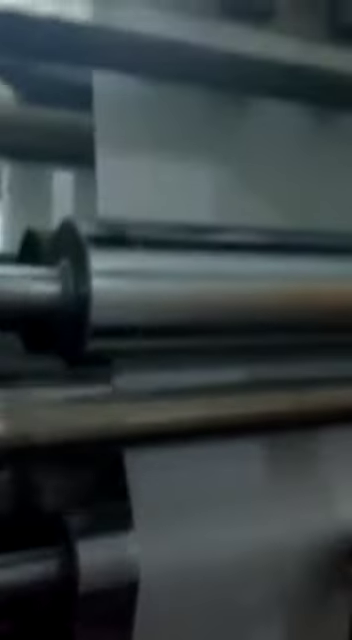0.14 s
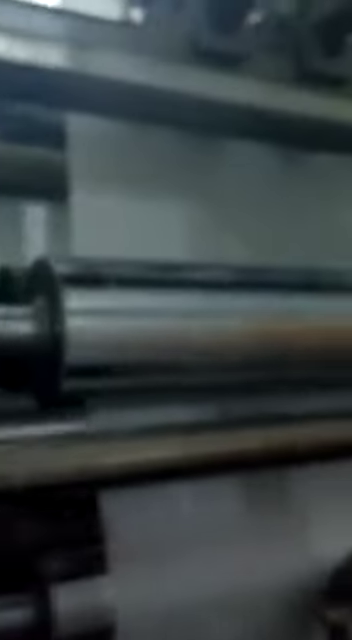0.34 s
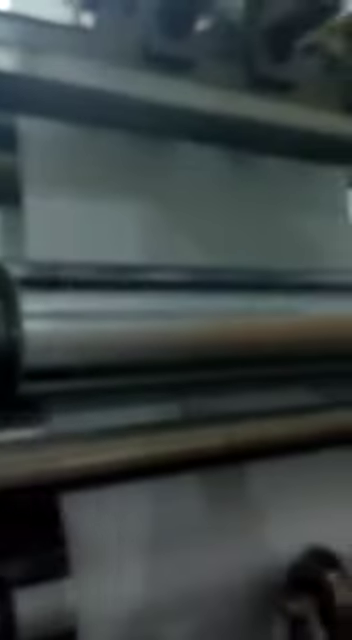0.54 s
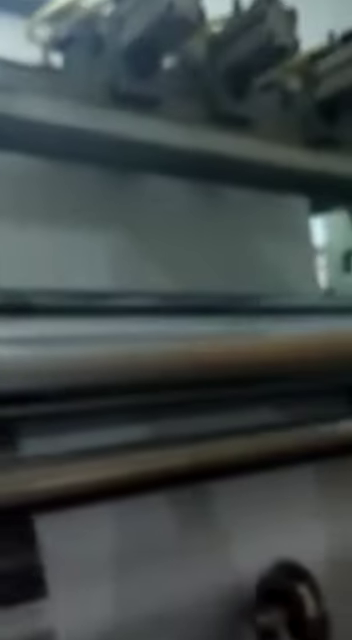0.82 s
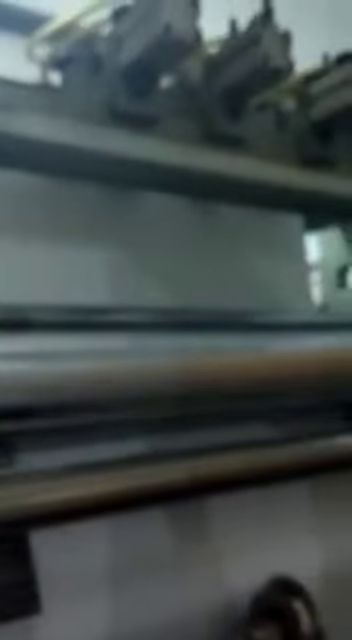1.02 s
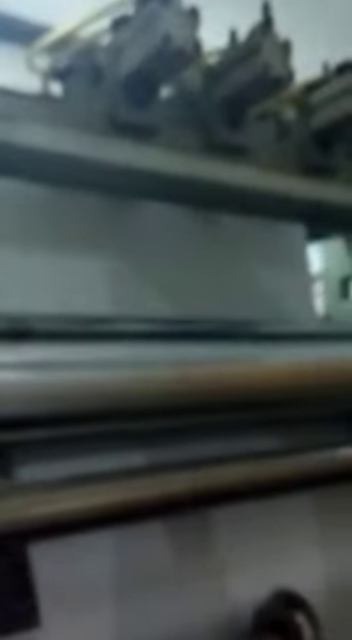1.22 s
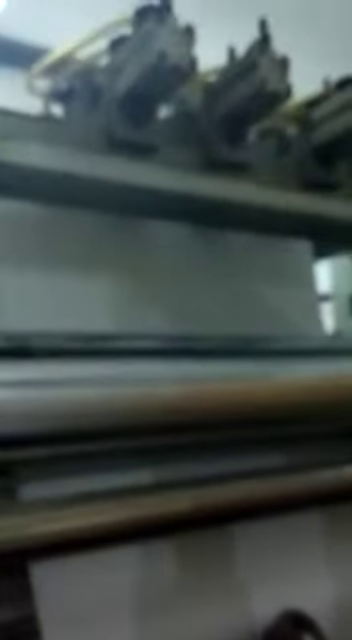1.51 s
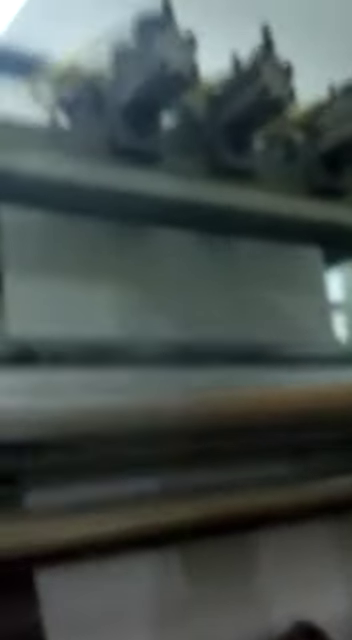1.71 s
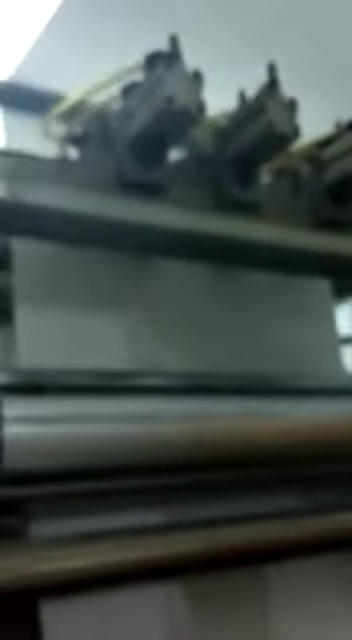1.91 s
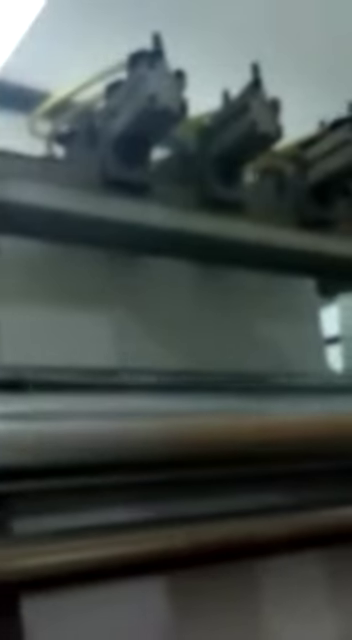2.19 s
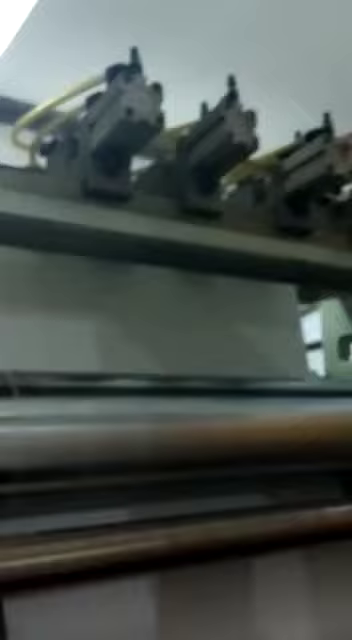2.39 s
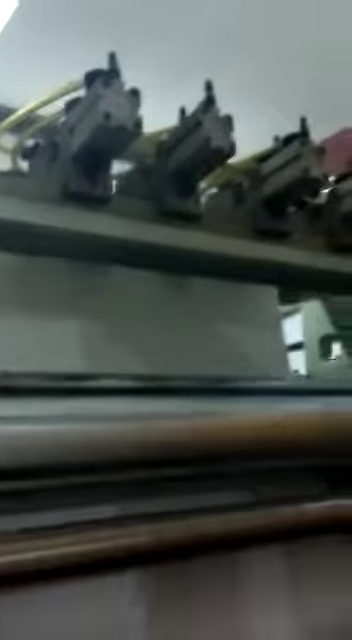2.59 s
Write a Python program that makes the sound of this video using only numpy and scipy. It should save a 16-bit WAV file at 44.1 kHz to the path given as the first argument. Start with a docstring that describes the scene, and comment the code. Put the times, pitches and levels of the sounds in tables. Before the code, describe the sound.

A paper converting machine runs throughout, close and loud in a workshop, in wide phone stereo. Dense midrange roller roar and low motor hum stay steady, swelling briefly near 0.2 s. Bright suction hiss pulses with dull clacks and sharp ticks, repeating every 0.66 s over fine rattle. A thin whine around 2.2 kHz beats quickly at first, then steadies and strengthens after 1.9 s. It never stops.

```python
"""In a workshop a paper converting machine runs: rollers and motors roar, suction air hisses, two gears whine.
Roar and hiss are shaped noise, hum and whine are drifting sines that beat, contacts are decaying noise bands.
The folding mechanism repeats a cycle of clacks and ticks, and the hiss breathes with it.
A phone hears it with two microphone ports and widens the stereo by subtracting each, delayed, from the other."""
import sys
import numpy as np
from scipy import signal
from scipy.fft import rfft, irfft, next_fast_len
from scipy.io import wavfile
from scipy.ndimage import uniform_filter1d, map_coordinates

SR = 44100
rng = np.random.default_rng(int(sys.argv[2]) if len(sys.argv) > 2 else 0)


def dump_mix(stems):
    """Bounce the given channels to the path in sys.argv[1] as a 16-bit WAV at rate SR."""
    frames = np.atleast_2d(stems).T  # one column per channel
    limited = np.clip(frames, -1, 1)  # hard clip at full scale
    pcm = np.round(limited * 32767).astype(np.int16)
    wavfile.write(sys.argv[1], SR, pcm)


N = 121275

CYCLE_S = .6575  # period of the folding mechanism
# Swing of the hiss through one cycle: (time into the cycle [s], level [dB])
BREATH = [(0, 1), (.045, 3), (.075, -6), (.14, -2), (.19, -3), (.26, -3), (.29, -6), (.35, -3.5), (.42, 0),
          (.47, 0.5), (.54, -2.5), (.62, 1.5)]
# Slow level of the two broadband sources: (time [s], roar level [dB], hiss level [dB])
SLOW_LEVELS = [(0, -3, -0.5), (.2, 4, 4.5), (.45, 1.5, 2.5), (.7, 1, 0), (.9, 2, 5), (.96, 1.5, 2),
               (1.1, 1.5, 1.5), (1.3, 2, 1), (1.42, -1, -0.5), (1.6, 1.5, 1.5), (1.8, 1.5, 1.5),
               (2.0, 2, 0), (2.25, 0.5, 2.5), (2.5, 0, -0.5), (2.62, 1.5, 2.5), (2.75, -1, 1.5)]


def amp(db):
    """Decibel law: an amplitude ratio is ten to the power dB / 20."""
    return 10 ** (np.asarray(db) / 20)


def along(points, hz):
    """Logarithmic frequency scale: columns of (frequency, ...) rows interpolated along it."""
    f, *columns = np.transpose(points)
    return np.array([np.interp(np.log(hz + 1), np.log(f + 1), c) for c in columns])


def curves(rows, period=None):
    """Envelope by linear interpolation: one value per sample for each column after the time."""
    knots_s, *columns = np.transpose(rows)
    return [np.interp(np.arange(N) / SR, knots_s, c, period=period) for c in columns]


def wobble(rate):
    """Slow random modulation: a smooth curve through `rate` Gaussian knots a second."""
    knots = rng.standard_normal(int(N * rate / SR) + 4)
    return map_coordinates(knots, [np.arange(N) * rate / SR])


def filtered(pair, response):
    """Linear filtering: a frequency-dependent rule acts on the spectra of the rows."""
    size = next_fast_len(N + 8192)
    spectra = response(rfft(pair, size), np.fft.rfftfreq(size, 1 / SR))
    return irfft(spectra, size)[..., :N]


def rush(gain, patchy_db):
    """Turbulent noise: two independent rows share random patches of level, then take a spectral gain."""
    spectra = signal.stft(rng.standard_normal((2, N)), nperseg=512)[2]
    # smooth over 6 frequency bins, then over 10 time frames
    field = uniform_filter1d(rng.standard_normal(spectra.shape[1:]), 6, 0)
    field = uniform_filter1d(field, 10, 1)
    patches = amp(patchy_db * field / field.std())
    pair = signal.istft(spectra * patches, nperseg=512)[1][:, :N]
    # about 0 dB per Hz before the gain
    return filtered(pair * np.sqrt(SR / 2), lambda z, hz: z * gain(hz))


def tone(hz, db, drift, start_s=0):
    """Phase modulation: a complex sine of rms level db, its phase wandering by about `drift` rad."""
    t = np.arange(N) / SR - start_s
    return np.sqrt(2) * amp(db) * np.exp(2j * np.pi * hz * t + 1j * drift * wobble(5.32))


def add_ring(out, start_s, hz, width_hz, db, t60):
    """Damped resonance: band-passed noise, independent in the two rows, decays 60 dB in t60 seconds."""
    attack_s = .003
    t = np.arange(int(.1 * SR)) / SR
    edges = np.clip([hz - width_hz / 2, hz + width_hz / 2], 100, SR / 2 - 100)
    band = signal.butter(2, edges, "band", fs=SR, output="sos")
    ring = signal.sosfilt(band, rng.standard_normal((2, len(t))))
    decay = amp(db - 60 * t / t60)
    onset = 1 - np.exp(-t / attack_s)
    out[:, round(start_s * SR):][:, :len(t)] += ring / ring.std() * decay * onset


def roller_roar():
    """Source and resonator: the noise of rollers and motors drones through the modes of the casing."""
    # Spectrum before the casing and the level curves: (frequency [Hz], density [dB per Hz])
    roar_spectrum = [(20, -70), (35, -60), (60, -59), (100, -47), (150, -46.5), (210, -44), (300, -50.5),
                     (450, -51), (620, -53), (800, -61.5), (1200, -57), (1450, -59.5), (1650, -59.5),
                     (2150, -62.5), (2350, -61.5), (2550, -61.5), (2800, -64), (3300, -67), (4200, -69.5),
                     (6000, -84), (9000, -116)]
    # Casing resonances: (frequency [Hz], width [Hz], gain at the centre [dB])
    casing_modes = [(182, 21, 1), (360.4, 18, 5), (487, 46, 3.5), (633.6, 24, 4.5), (806, 37, 4.5),
                    (936, 112, 4), (1083, 13, 3.5), (1183, 27, 2.5), (1356, 23, 6), (1758, 47, 5),
                    (1860, 30, 4.5), (2230, 110, 6.5)]
    # Rumble relative to the rest of the roar: (time [s], level [dB])
    rumble_levels = [(0, 5), (.1, -0.5), (.25, -1), (.42, 1), (.52, -2), (.63, 0.5), (.9, 0.5), (1.1, 1),
                     (1.3, -0.5), (1.5, 1), (1.8, 0), (2.1, 0), (2.3, 2), (2.5, -3), (2.75, 2)]
    rumble_low_hz, rumble_top_hz = 320, 700
    patchy_db, flutter_db = 1.3, .6
    breath_share = 0.34  # part of the cycle's swing, in dB, that the roar follows

    def casing(hz):
        resonance_db = sum(db / (1 + (2 * (hz - c) / w) ** 2) for c, w, db in casing_modes)
        return amp(along(roar_spectrum, hz)[0] + resonance_db)

    def rumble_band(z, hz):
        return z / (1 + (hz / rumble_top_hz) ** 10 + (rumble_low_hz / (hz + 1)) ** 10)

    breath_db, = curves(BREATH, period=CYCLE_S)
    slow_db, _ = curves(SLOW_LEVELS)
    rumble_db, = curves(rumble_levels)
    drone = rush(casing, patchy_db)
    rumble = filtered(drone, rumble_band)
    level = amp(slow_db + breath_share * breath_db + flutter_db * wobble(20))
    return level * (drone + (amp(rumble_db) - 1) * rumble)


def suction_hiss():
    """Jet noise: suction air makes broadband noise whose level swings with the cycle, less at the top."""
    # Spectrum before the level curves: (frequency [Hz], density [dB per Hz])
    hiss_spectrum = [(1000, -83), (2500, -75), (4200, -99), (4800, -74.5), (6000, -70.5), (7200, -73.5),
                     (8800, -71.5), (10000, -68), (11300, -64.5), (12400, -66.5), (14000, -67)]
    patchy_db, flutter_db = 1.3, .6
    top_share, top_from_hz = .68, 9500  # the highest hiss follows this part of the swing in dB
    breath_db, = curves(BREATH, period=CYCLE_S)
    _, slow_db = curves(SLOW_LEVELS)
    air = rush(lambda hz: amp(along(hiss_spectrum, hz)[0]), patchy_db)
    top = filtered(air, lambda z, hz: z / (1 + (top_from_hz / (hz + 1)) ** 20))
    breathing = amp(breath_db) * (air - top) + amp(top_share * breath_db) * top
    return amp(slow_db + flutter_db * wobble(26.22)) * breathing


def gear_whine():
    """Beating: two gears close in pitch alternately reinforce and oppose; sidebands flank the first."""
    # Levels before the waver: (time [s], first gear [dB rms], second gear [dB rms])
    whine_levels = [(0, -30.5, -31.5), (.25, -30, -32), (.5, -32, -33.5), (.75, -36, -33), (1, -34.5, -35),
                    (1.2, -31.5, -41), (1.5, -31, -43), (1.75, -30.5, -43), (1.9, -27, -43),
                    (2.1, -27, -44), (2.4, -25.5, -42), (2.6, -24.5, -41), (2.75, -25, -41)]
    # Steady sidebands of the first gear: (offset [Hz], level [dB rms])
    sidebands = [(-76.5, -45.5), (-49.3, -46), (49.2, -43.5)]
    whine_hz, beat_hz = 2211.3, 11.5
    dip_s = .1  # the gears oppose each other at this moment, apart from their drifts
    waver_db = 2.2
    first_apart, second_apart, turn_rad = -1.0, -.45, .1  # unlike parts between the ports and their phase

    waver = waver_db * np.array([wobble(30), wobble(30)])
    first_db, second_db = curves(whine_levels) + waver
    first = tone(whine_hz, first_db, .12, dip_s)
    first = first + sum(tone(whine_hz + offset, db, .5, dip_s) for offset, db in sidebands)
    second = -tone(whine_hz + beat_hz, second_db, .2, dip_s)
    unlike = np.exp(1j * turn_rad) * (first_apart * first + second_apart * second)
    return np.array([first + second, unlike]).real


def folding_contacts():
    """Impact excitation: every cycle strikes the same resonances at the same points, varying in force."""
    # Contacts before the scatter, level before the onset and decay:
    # (time into the cycle [s], centre [Hz], width [Hz], level [dB], t60 [s])
    contacts = [(0.036, 2980, 2500, -13.5, 0.019), (.044, 2500, 1570, -11.5, 0.029),
                (.155, 5500, 2500, -18, 0.022), (.178, 5600, 1200, -24.5, 0.058),
                (0.179, 8440, 1800, -19.5, 0.044), (.178, 11800, 4500, -19.5, .022),
                (.192, 10900, 3020, -21, 0.068), (0.358, 10900, 2400, -17, 0.05),
                (.400, 6200, 2000, -13, 0.014), (.400, 10800, 2500, -10, 0.015),
                (0.445, 5900, 4000, -23, 0.047), (0.578, 10600, 2500, -12, 0.015),
                (0.619, 6400, 3030, -18, 0.021)]
    scatter_db = 1.5
    out = np.zeros((2, N + SR))
    for cycle in range(int(N / SR / CYCLE_S) + 1):
        for time_s, hz, width_hz, db, t60 in contacts:
            add_ring(out, time_s + cycle * CYCLE_S, hz, width_hz, db + rng.normal(0, scatter_db), t60)
    return out[:, :N]


def stray_rings():
    """Narrow-band damped resonance: a few short high rings apart from the cycle's pattern."""
    # Level before the onset and decay: (time [s], level [dB])
    chirps = [(.655, -10.5), (.849, -8), (1.29, -12), (2.371, -11), (2.384, -11), (2.605, -13)]
    out = np.zeros((2, N + SR))
    for time_s, db in chirps:
        add_ring(out, time_s, hz=11400, width_hz=600, db=db, t60=.03)
    return out[:, :N]


def fine_rattle():
    """Random impacts: many faint ticks at independent times, with exponentially spread dB levels."""
    ticks_per_s, floor_db, spread_db = 220, -36, 2.5
    out = np.zeros((2, N + SR))
    for when, pitch, force in rng.random((int(ticks_per_s * N / SR), 3)):
        db = floor_db - spread_db * np.log(1 - force)
        add_ring(out, when * N / SR, 3500 * 2.7 ** pitch, 2500, db, .012)
    return out[:, :N]


def motor_hum():
    """Tonal radiation: the motors sound low tones with slowly wandering level and phase."""
    # Motor tones before the level wander: (frequency [Hz], level [dB rms])
    motor_tones = [(49.3, -35.5), (89.6, -32), (148.2, -31), (543, -38.5)]
    hum = sum(tone(hz, db + 1.0 * wobble(6.0), drift=.95) for hz, db in motor_tones)
    return np.array([hum, 0.11 * hum]).real  # parts like and unlike between the ports


def ports(pair):
    """Spatial coherence: long waves reach both ports alike; the right port faces the hiss."""
    # Relation of the ports: (frequency [Hz], likeness [-1 to 1], phase [rad], left over right [dB])
    port_relation = [(40, .995, -.03, 1.2), (100, .99, .12, 2.2), (200, .96, -.05, 2), (450, .87, 0, 2.2),
                     (650, .75, -.1, 1.5), (900, .5, -.1, .5), (1250, 0, 0, 0), (1700, -.35, 0, 0),
                     (2050, -.3, 0, 0), (2180, .15, 0, 0), (2330, .5, 0, 0), (2550, .45, 0, 0),
                     (3000, .2, 0, 0), (3600, 0, 0, 0), (4200, -.15, 0, 0), (5000, 0, 0, 0),
                     (7000, 0, 0, 0), (9000, 0, 0, -4), (11000, 0, 0, -6), (14000, 0, 0, -7)]

    def mix(z, hz):
        likeness, phase, tilt_db = along(port_relation, hz)
        # for two independent rows of equal power the correlation is cos(2 * angle)
        angle = np.arccos(np.clip(likeness, -1, 1)) / 2
        like, unlike = np.cos(angle) * z[0], np.sin(angle) * z[1]
        left = (like + unlike) * amp(tilt_db / 2) * np.exp(.5j * phase)
        right = (like - unlike) * amp(-tilt_db / 2) * np.exp(-.5j * phase)
        return np.array([left, right])
    return filtered(pair, mix)


def scene():
    """Superposition: the sources add as pressures before the two ports."""
    broadband = roller_roar() + suction_hiss()
    mechanism = folding_contacts() + stray_rings() + fine_rattle()
    return ports(broadband + mechanism + gear_whine() + motor_hum())


def record(dry):
    """Delay-and-subtract directivity: each side loses a delayed share of the other, below a band limit."""
    # (frequency [Hz], share of the other port taken off [ratio], its phase lead [rad], left over right [dB])
    cross = [(100, .9, 0, 0), (1150, .78, 0, -1), (2200, .75, 0, -1.6), (2320, .94, -.05, -1),
             (2420, .82, 0, -1.2), (2600, .8, 0, -1.4), (3500, .88, 0, -1.2), (4700, .97, -.08, -.6),
             (5300, .85, .1, -1), (6000, .64, .45, -1.4), (6600, .6, .2, -1.6), (7100, .52, .1, -1.8),
             (9000, .29, .65, -.6), (14000, .2, .65, -.6)]
    delay_s, top_hz = 1 / 2345, 14280

    def widen(z, hz):
        share, lead, tilt_db = along(cross, hz)
        other = share * np.exp(1j * lead - 2j * np.pi * hz * delay_s) * z[::-1]
        return (z - other) * amp([tilt_db / 2, -tilt_db / 2]) * (hz < top_hz)
    return filtered(dry, widen)


dry = scene()
out = record(dry)
dump_mix(out)
```